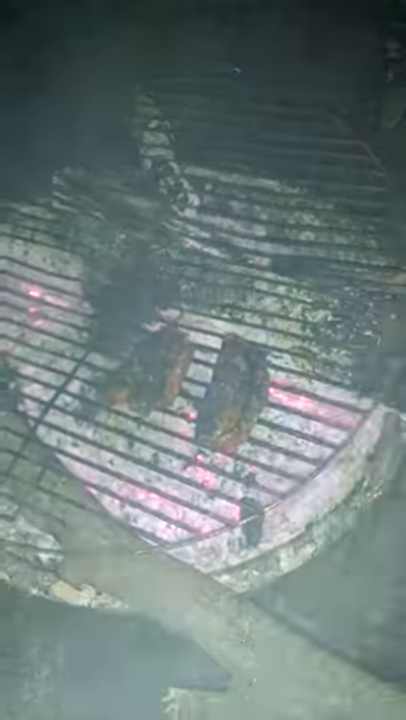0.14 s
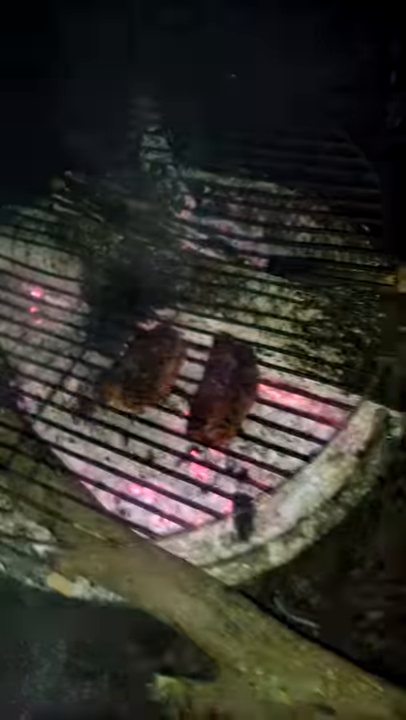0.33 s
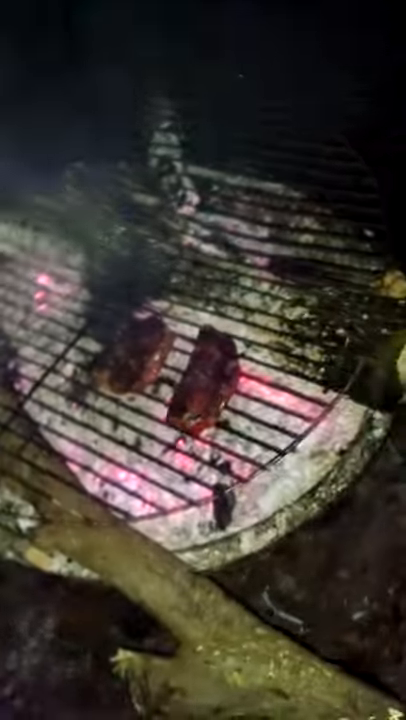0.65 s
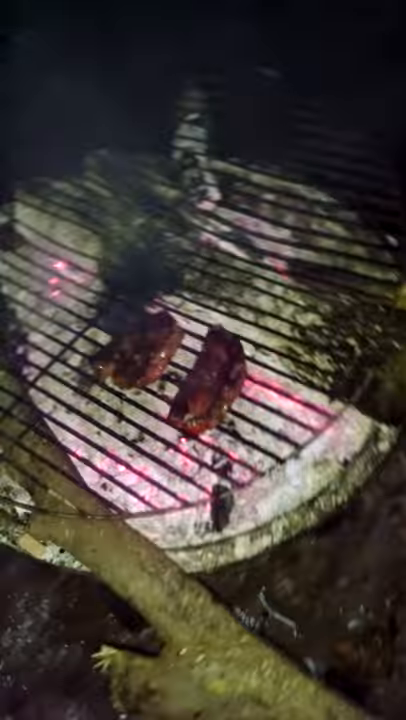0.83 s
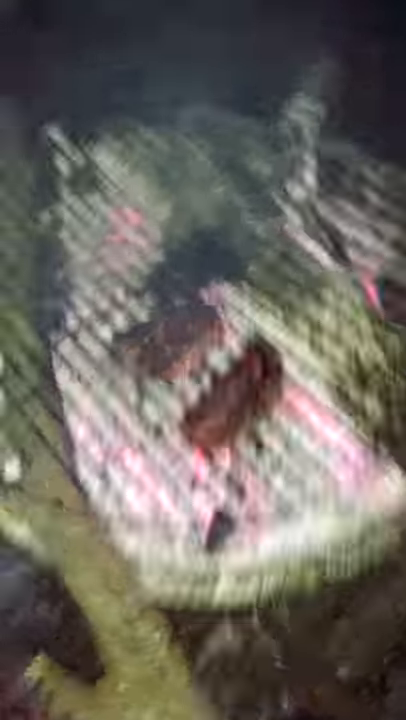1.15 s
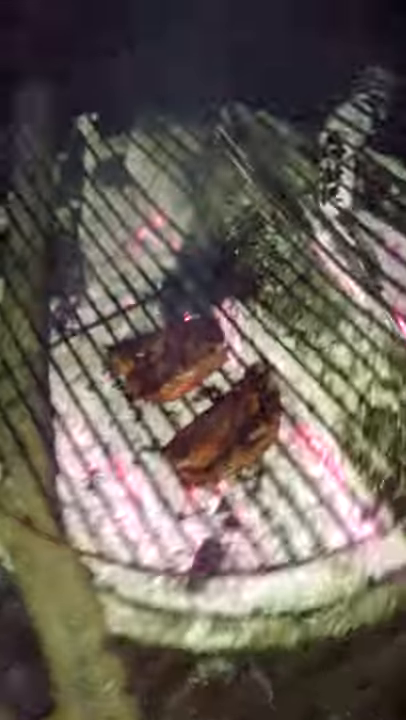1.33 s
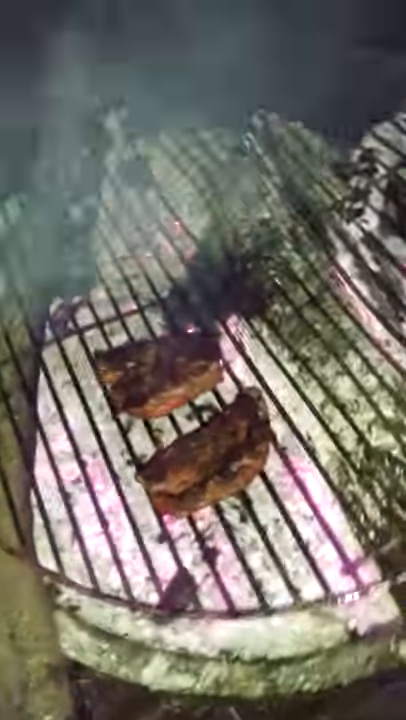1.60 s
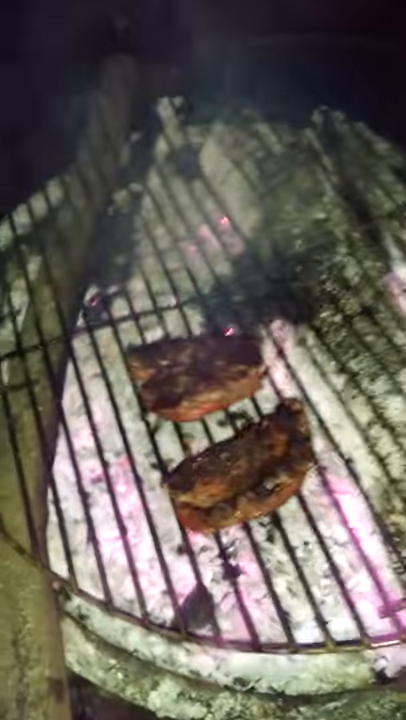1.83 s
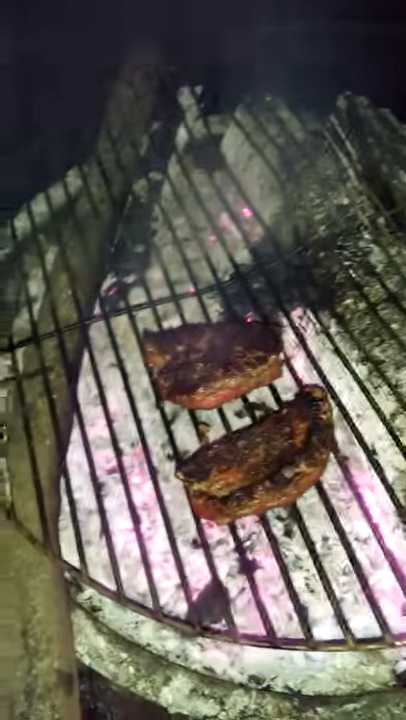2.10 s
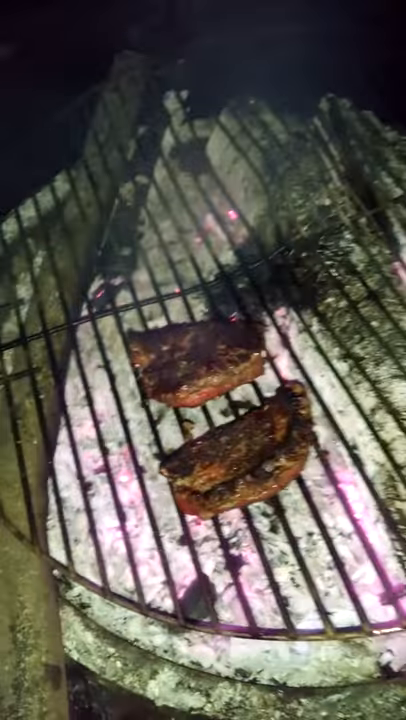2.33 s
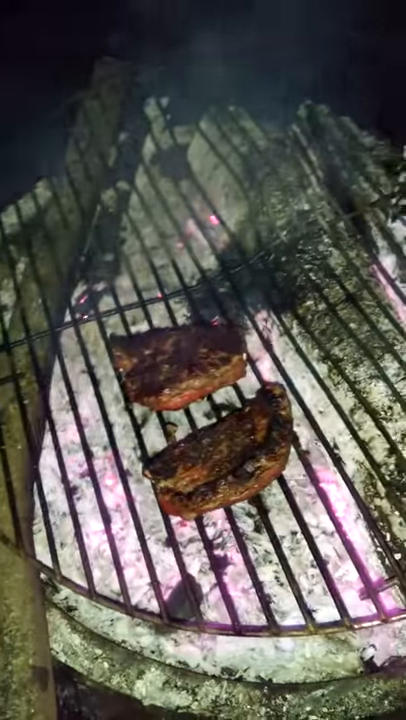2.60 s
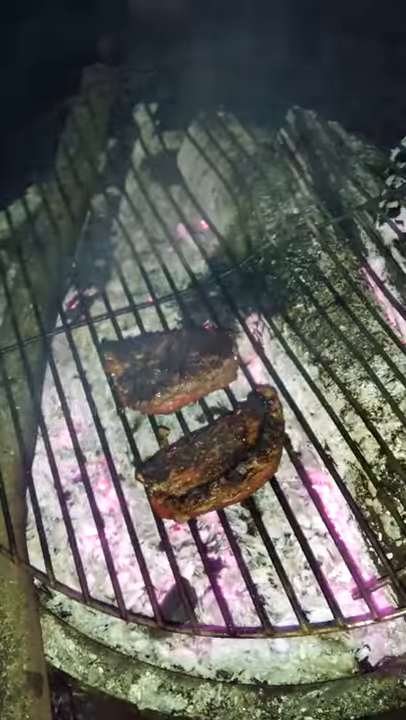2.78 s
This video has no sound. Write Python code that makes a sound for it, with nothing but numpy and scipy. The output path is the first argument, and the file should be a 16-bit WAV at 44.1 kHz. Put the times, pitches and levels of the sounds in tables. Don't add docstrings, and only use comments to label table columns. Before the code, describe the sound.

Sizzling meat over hot coals, spitting and popping, with distant traffic and insects faintly behind

```python
import sys
import numpy as np
from scipy import signal
from scipy.fft import rfft, irfft, next_fast_len
from scipy.io import wavfile
from scipy.ndimage import uniform_filter1d, map_coordinates

SR = 44100
rng = np.random.default_rng(int(sys.argv[2]) if len(sys.argv) > 2 else 0)


def store_wav(level_fs):
    pcm = np.round(np.clip(np.atleast_2d(level_fs), -1, 1) * 32767)
    wavfile.write(sys.argv[1], SR, pcm.T.astype(np.int16))


def convert_level_to_amplitude(level_db):
    exponent = np.asarray(level_db, float) / 20
    return 10 ** exponent


N = 130095


def unit(x):
    return x / np.sqrt(np.mean(x ** 2) + 1e-20)


def tone(points):
    f, db = np.transpose(points)
    log_f = np.log(np.r_[f[0] / 1.25, f, f[-1] * 1.1])
    closed_db = np.r_[-60, db, -60]
    return lambda hz: convert_level_to_amplitude(np.interp(np.log(hz + 1), log_f, closed_db))


def resonances(peaks):
    def response(f):
        total = 0
        for k, (center, width, db) in enumerate(peaks):
            damping = 1j * f * width
            total = total + (-1) ** k * convert_level_to_amplitude(db) * damping / (center ** 2 - f ** 2 + damping)
        return total
    return response


def curves(rows):
    s, *cols = np.transpose(rows)
    return [np.interp(np.arange(N) / SR, s, c) for c in cols]


def wobble(rate):
    knots = rng.standard_normal(int(N * rate / SR) + 4)
    return map_coordinates(knots, [np.arange(N) * rate / SR])


def filtered(x, response):
    m = next_fast_len(N + 8192)
    return irfft(rfft(x, m) * response(np.fft.rfftfreq(m, 1 / SR)), m)[..., :N]


def patches(shape, bands, frames):
    field = uniform_filter1d(rng.standard_normal(shape), size=bands, axis=0)
    return uniform_filter1d(field, size=frames, axis=1)


def rush(response, patchy_db):
    z = signal.stft(rng.standard_normal((2, N + 512)), nperseg=512)[2]
    gain = convert_level_to_amplitude(patchy_db * unit(patches(z.shape[1:], 8, 10)))
    noise = signal.istft(z * gain, nperseg=512)[1][:, :N]
    return unit(filtered(noise, response))


def sizzle():
    # t/s, level/dB
    fizz = [(0.0, -51), (0.59, -53), (1.06, -54), (1.58, -52), (1.73, -51.5), (2.34, -50), (2.76, -49.5),
            (2.95, -51.5)]
    # f/Hz, density/dB per Hz
    fizz_tone = [(4000, -38), (5000, -3), (7000, -10.5), (8500, 0.5), (10300, 0.5), (11500, -5),
                 (13500, -1.5), (15500, -4)]
    bubbles_per_s, bubble_spread_db = 1100, 3
    bubbles_db, hiss_db = -5.5, 3
    strength_db, = curves(fizz)
    count = int(bubbles_per_s * N / SR)
    when, pitch, size = rng.random((count, 3)).T
    k = np.arange(24)
    hz = 6000 * 2.5 ** pitch[:, None]
    level = convert_level_to_amplitude(-bubble_spread_db * np.log(size + 0.0059))[:, None]
    pop = level * np.sin(2 * np.pi * hz * k / SR) * np.exp(-k * hz / SR)
    places = (when * N).astype(int)[:, None] + k
    pops = np.bincount(places.ravel(), pop.ravel(), N + 24)[:N]
    pops = unit(filtered(pops, tone(fizz_tone)))
    pair = np.array([pops, np.roll(pops, 31)])
    hiss = rush(tone(fizz_tone), patchy_db=3.0) + convert_level_to_amplitude(bubbles_db) * pair
    return convert_level_to_amplitude(strength_db + hiss_db + 1.1 * wobble(14)) * hiss


def crackles():
    # t/s, peak level/dB, ring f/Hz
    cracks = [(0.1905, -32, 9550), (0.2423, -34, 10100), (0.3227, -28.5, 9520), (0.5661, -36, 8720),
              (0.6709, -31, 9900), (0.7577, -31, 8980), (0.8066, -28.5, 9500), (1.057, -33, 9260),
              (1.0834, -31, 9900), (1.0994, -29, 9280), (1.3678, -29.5, 9000), (1.5204, -30, 9600),
              (1.5658, -28, 10300), (1.6821, -30, 14800), (1.8228, -39, 9280), (1.9744, -33, 9920),
              (2.2633, -32, 8850), (2.2807, -24.5, 10300), (2.3735, -21.5, 10000), (2.4793, -35, 9000),
              (2.5461, -30, 8940), (2.7467, -34, 8590), (2.7891, -24, 8700), (2.9163, -41, 9950),
              (2.2734, -34, 9480),
        (2.2954, -35, 10100),
    ]
    # f/Hz, density/dB per Hz
    crack_tone = [(600, -20), (2000, -11), (3000, -11), (4200, -25), (6000, -2.5), (9500, 0), (12000, 1),
                  (15500, 3)]
    # t/s, peak level/dB, f/Hz
    knocks = [
        (1.678, -22, 800),
        (1.692, -19.5, 560),
    ]
    t60_s, rise_s, late_s, crack_db = .0065, .0003, .0008, 3
    sharp, dull = np.zeros((2, N + SR)), np.zeros(N + SR)
    t = np.arange(600) / SR
    for s, db, hz in cracks:
        burst = rng.standard_normal((2, len(t))) + 0.68 * np.sin(2 * np.pi * hz * t)
        decay = convert_level_to_amplitude(db + crack_db - 60 * t / t60_s) * (1 - np.exp(-t / rise_s))
        sharp[:, round((s + late_s) * SR):][:, :len(t)] += decay * burst
    for s, db, hz in knocks:
        swell = np.exp(-(t * hz - .55) ** 2 / .25)
        dull[round(s * SR):][:len(t)] += convert_level_to_amplitude(db) * np.sin(2 * np.pi * hz * t) * swell
    return filtered(sharp[:, :N], tone(crack_tone)) + dull[:N]


def spurt():
    spurt_s = [1.545, 1.561, 1.567, 1.581, 1.596, 1.615, 1.632, 1.648, 1.67]
    # jet level/dB, brightness/dB
    spurt_levels = [(-41, -1), (-33, -9), (-28, -4), (-27, -2), (-25, -0.5), (-28, -2), (-37, 1),
                    (-42.5, -4), (-44, 2)]
    # t/s, length/s
    puff_s = [
        (.944, .013),
        (1.174, .004),
        (1.519, .016),
        (2.227, .003),
        (2.263, .004),
        (2.28, .005),
    ]
    puff_levels = [-35, -34, -31, -39, -36, -33]
    # f/Hz, width/Hz, level/dB
    cavity = [(1450, 800, -5), (2130, 480, 0), (4250, 1000, -3)]
    # f/Hz, width/Hz, level/dB
    puff_cavity = [(900, 600, -5), (2100, 500, 0), (4300, 700, -15)]
    # f/Hz, density/dB per Hz
    jet_tone = [(4500, -16), (5500, -7), (6800, -5), (7600, -11), (9000, -1), (10300, 0), (11500, -10),
                (15500, -11)]
    jet_over_cavity_db, puff_bright_db, splutter_db = -2.5, -10.5, 2.2
    t = np.arange(N) / SR

    def hump(start, length):
        return np.sqrt(np.abs(np.sin(np.pi * np.clip((t - start) / length, 0, 1))))

    def steep(f):
        pocket = resonances(cavity)(f)
        return pocket * np.abs(pocket) ** 1.4

    jet_db, bright_db = curves(np.c_[spurt_s, spurt_levels])
    main = convert_level_to_amplitude(jet_db) * (t > spurt_s[0]) * (t < spurt_s[-1])
    puffs = sum(convert_level_to_amplitude(db) * hump(s, length) for (s, length), db in zip(puff_s, puff_levels))
    air = main * rush(steep, patchy_db=0.5) + puffs * rush(resonances(puff_cavity), patchy_db=6)
    bright = main * convert_level_to_amplitude(bright_db) + puffs * convert_level_to_amplitude(puff_bright_db)
    air = air + convert_level_to_amplitude(jet_over_cavity_db) * bright * rush(tone(jet_tone), patchy_db=1.0)
    air = convert_level_to_amplitude(splutter_db * wobble(250)) * air
    whoop = convert_level_to_amplitude(-28.5) * hump(1.592, .036) ** 2 * rush(resonances([(645, 90, 0)]), patchy_db=0)
    return ports(air) * convert_level_to_amplitude([[-1.5], [0]]) + ports(whoop) * convert_level_to_amplitude([[-7], [0]])


def far_road():
    # f/Hz, density/dB per Hz
    road_tone = [(200, -8), (350, -5), (750, 0), (1200, -3), (1600, -9), (2200, -7.5), (2600, -24.5),
                 (3200, -23.5)]
    # f/Hz, density/dB per Hz
    rumble_tone = [(20, -16), (40, -3.5), (55, 5.5), (80, 0.5), (95, -1), (106, -1), (130, -6), (200, -7.5)]
    engine_hz, engine_db = 105.7, -51
    drone = convert_level_to_amplitude(-35 + 0.94 * wobble(2.51)) * rush(tone(road_tone), patchy_db=0.66)
    rumble = convert_level_to_amplitude(-42 + 1.8 * wobble(3.96)) * rush(tone(rumble_tone), patchy_db=-0.6)
    phase = 2 * np.pi * engine_hz * np.arange(N) / SR + 0.62 * wobble(6.1)
    hum = convert_level_to_amplitude(engine_db + 2.9 * wobble(3.8)) * np.sin(phase)
    return drone + rumble + hum * np.array([[1], [-.3]])


def insects():
    # f/Hz, density/dB per Hz
    chorus_tone = [(3150, -17), (3450, 4), (3700, 6), (4000, 4), (4300, -7), (4600, -13), (5200, -61.5)]
    level_db = -44 + .7 * wobble(3.63) + 1.07 * wobble(39.82)
    return convert_level_to_amplitude(level_db) * rush(tone(chorus_tone), patchy_db=1.5)


def self_noise():
    # f/Hz, density/dB per Hz
    hiss_tone = [(4300, -10), (7000, 1.5), (11000, -7), (15500, 1)]
    return convert_level_to_amplitude(-57.5) * rush(tone(hiss_tone), patchy_db=-3.5)


def ports(pair):
    # f/Hz, likeness/0..1
    alike = [(60, 0.52), (180, 0.7), (380, 0.32), (800, 0.73), (1200, 0.93), (2200, 0.92), (4000, 0.94),
             (6000, 0.96), (9000, 0.96), (15000, .5)]
    # f/Hz, level/dB
    left_level = [(30, -3), (60, -4.5), (180, -2), (500, -1.1), (900, 1.24), (1600, -2), (4000, -3),
                  (6000, -3), (8500, -11), (15000, -14.5)]
    # f/Hz, phase/rad
    left_turn = [(0, .5), (1200, .2), (2240, -2.3), (3960, -6.4), (8960, -17.9), (16000, -33.1)]

    def on(points, hz):
        f, value = np.transpose(points)
        return np.interp(np.log(hz + 1), np.log(f), value)

    def share(hz):
        angle = np.arccos(np.clip(on(alike, hz), 0, 1)) / 2
        return np.array([np.cos(angle), np.sin(angle)])

    def left(hz):
        return convert_level_to_amplitude(on(left_level, hz)) * np.exp(1j * np.interp(hz, *np.transpose(left_turn)))

    common, apart = filtered(pair, share)
    return np.array([filtered(common + apart, left), common - apart])


def scene():
    spitting = crackles() * np.array([[1], [.4]])
    return ports(far_road() + insects() + sizzle()) + spurt() + ports(spitting) + self_noise()


def band_limit(x):
    return signal.sosfilt(signal.butter(12, 16790, fs=SR, output="sos"), x)


def record(dry):
    return band_limit(dry)


dry = scene()
out = record(dry)
store_wav(out)
```